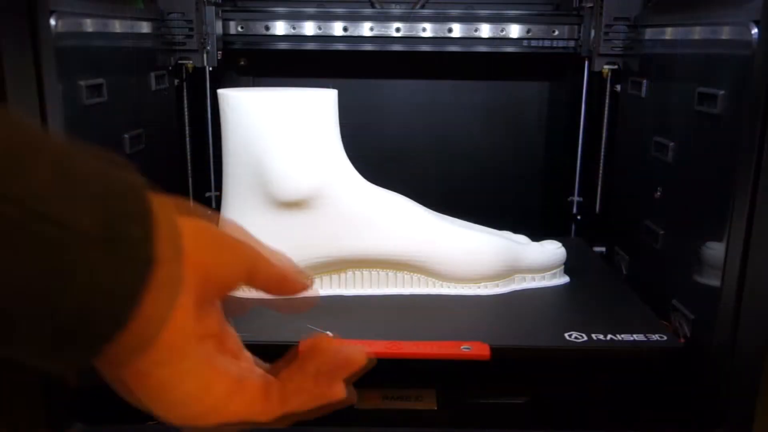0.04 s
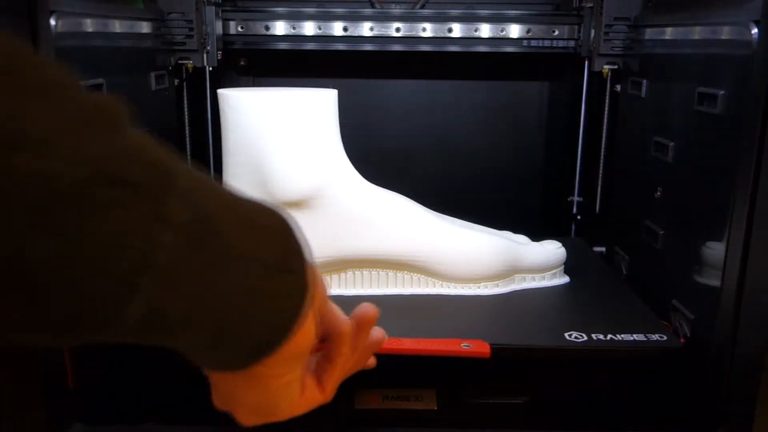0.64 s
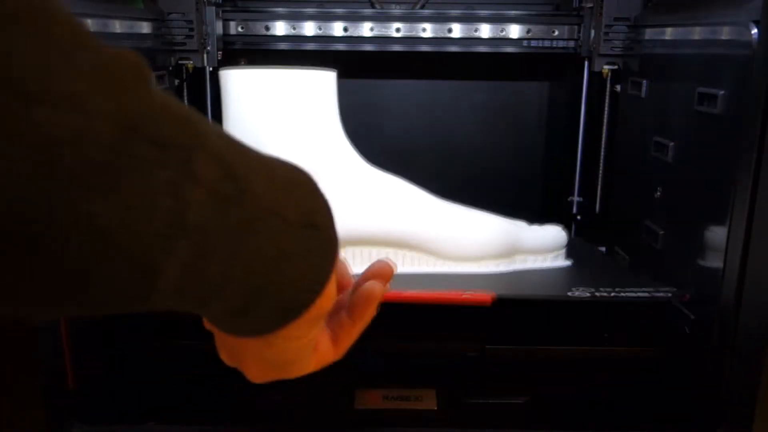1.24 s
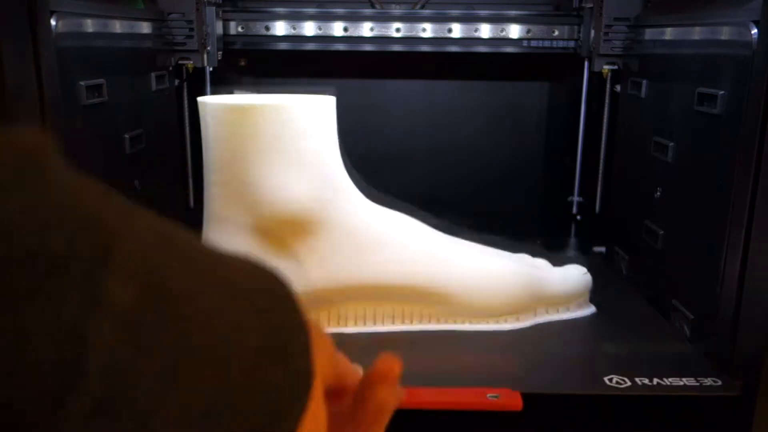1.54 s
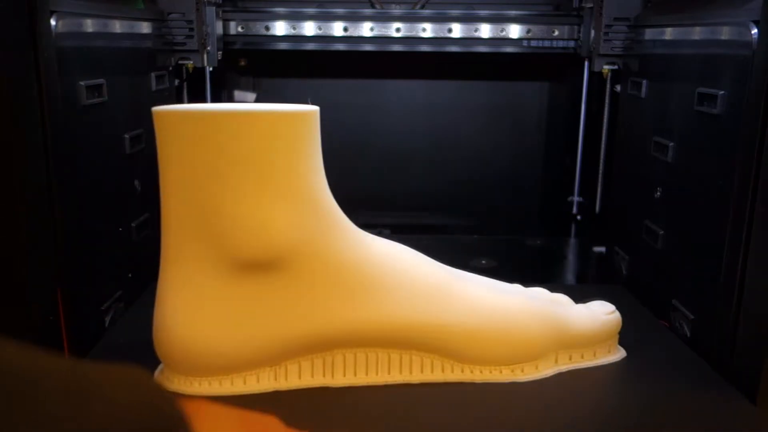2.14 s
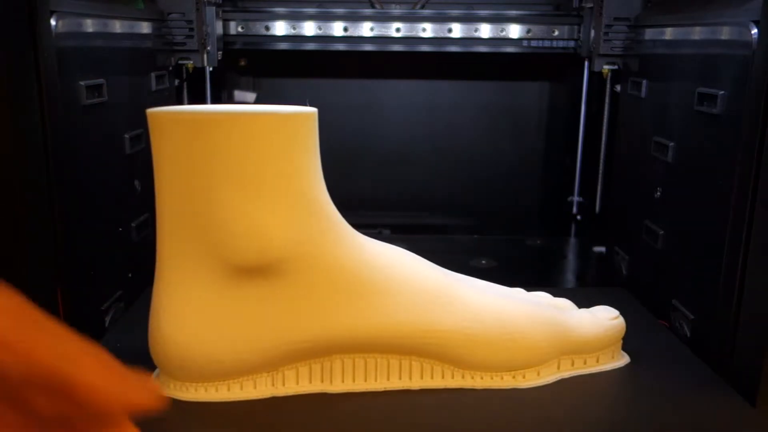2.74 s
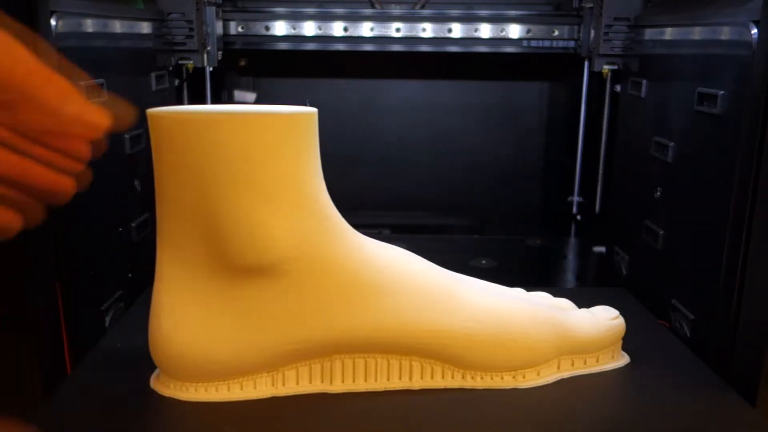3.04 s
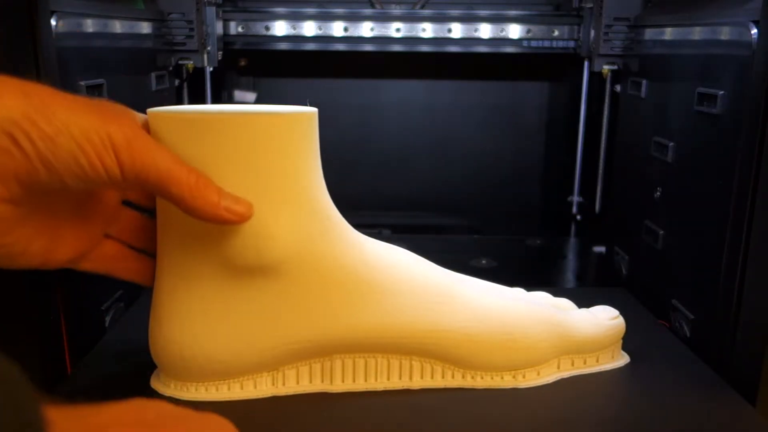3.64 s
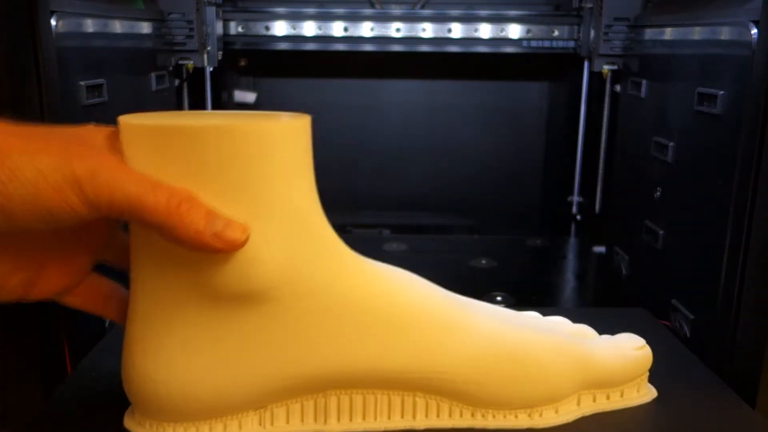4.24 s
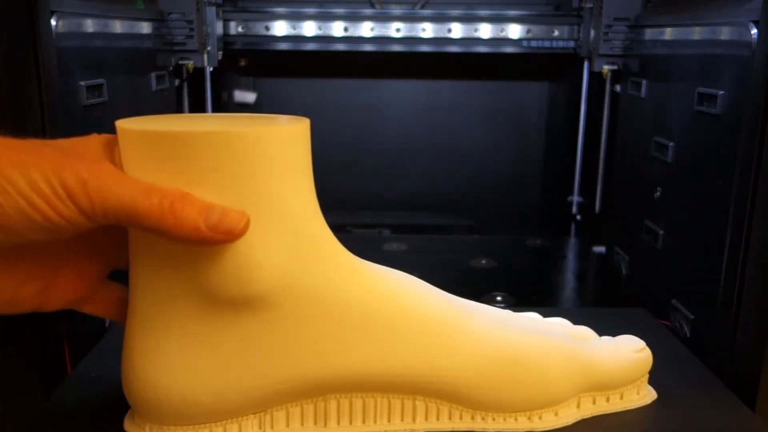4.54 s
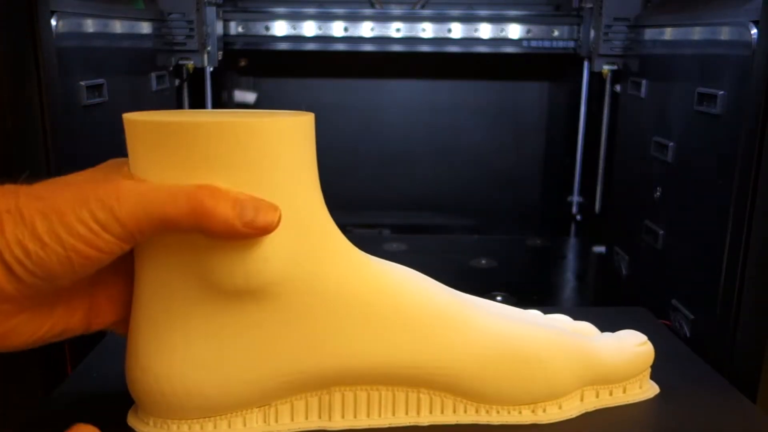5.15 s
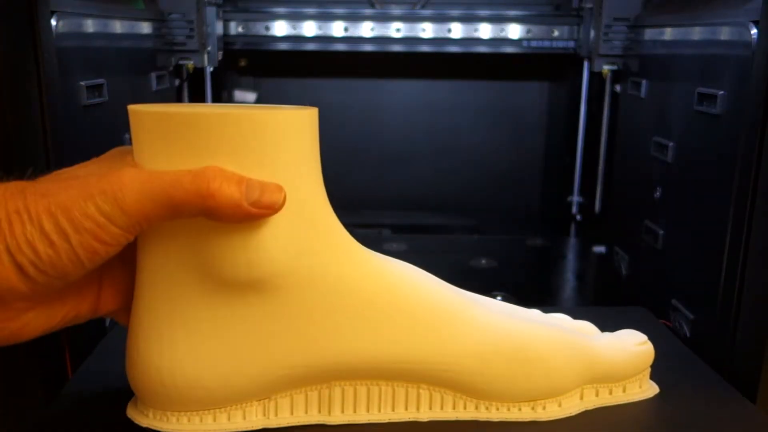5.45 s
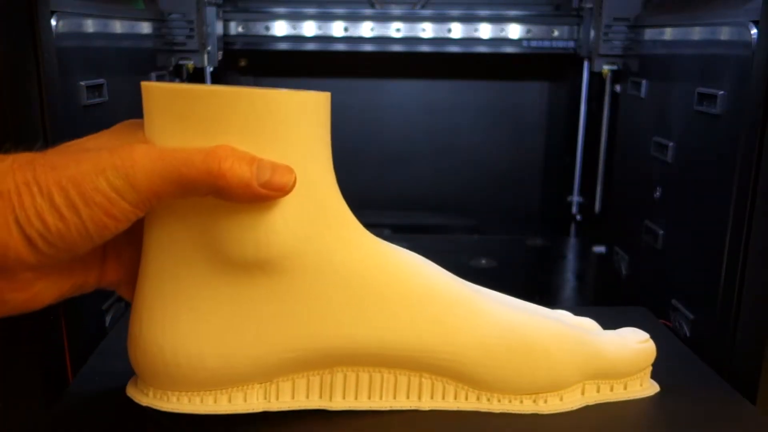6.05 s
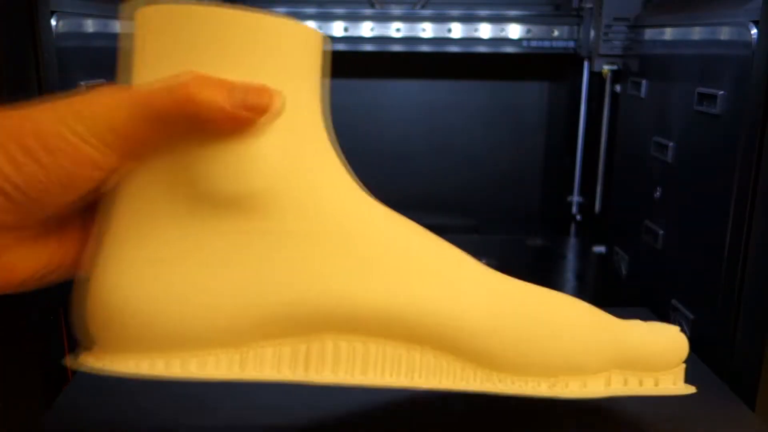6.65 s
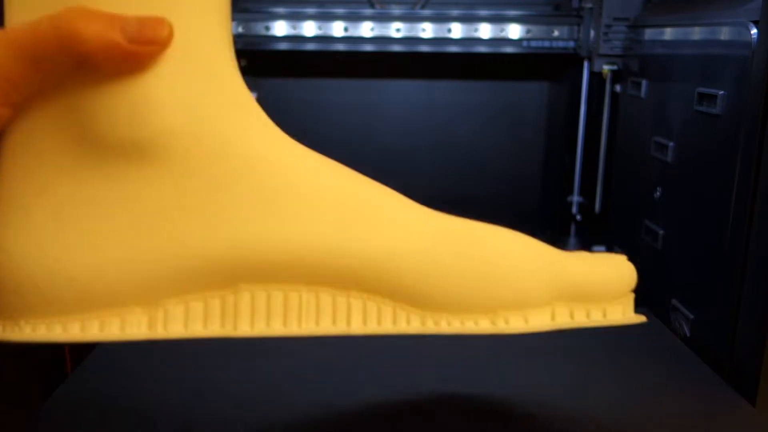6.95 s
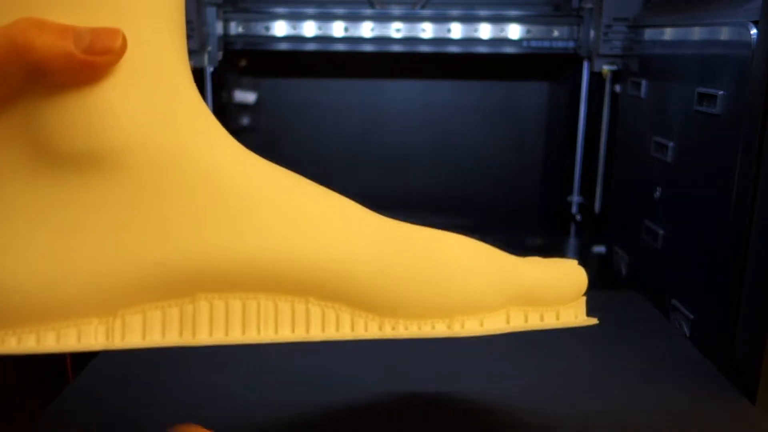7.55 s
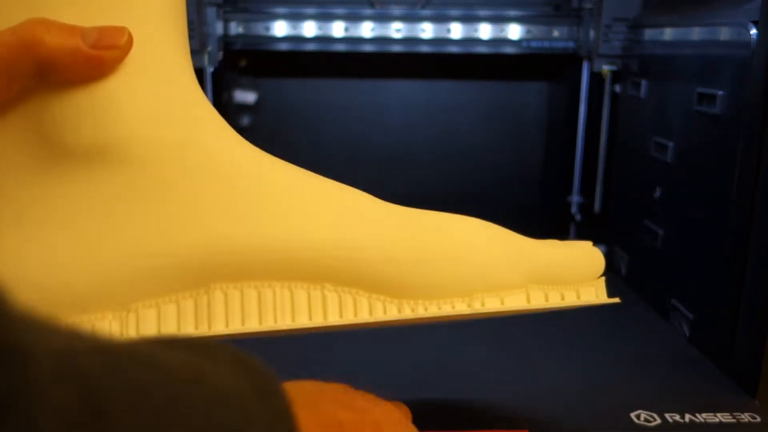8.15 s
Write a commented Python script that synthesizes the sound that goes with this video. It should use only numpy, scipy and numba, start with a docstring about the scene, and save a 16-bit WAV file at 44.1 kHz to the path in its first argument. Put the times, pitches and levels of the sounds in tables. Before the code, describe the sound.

Cooling fans hum faintly in a small room. Close by, a 3D printer's build plate clicks, rasps briefly over its bed and bumps to a stop. A sleeve brushes and rustles softly. Then the plate is bent, and a large hollow plastic print cracks away in sharp spurts before tearing loose all at once. The plate springs back with a ringing clatter, followed by a few lighter knocks, more sleeve brushing and a click.

```python
"""A large hollow print cracks off a flexible build plate in a 3D printer's chamber.
A hand first slides the plate forward, rasping over the bed until it bumps, then bends it.
The bond snaps in spurts that ring the plastic shell, then tears loose all at once.
The plate springs back and is knocked about, ringing in its modes.
A sleeve brushes the machine; cooling fans hum in a small room."""
import sys
import numpy as np
from scipy import signal
from scipy.fft import rfft, irfft, next_fast_len
from scipy.io import wavfile
from numba import njit

SR = 44100
rng = np.random.default_rng(int(sys.argv[2]) if len(sys.argv) > 2 else 0)


def to_wav(sig):
    """Store sig (one row per channel, or 1-D mono) as 16-bit WAV at the path in sys.argv[1].

    Samples outside -1..1 are clipped; the rate is SR.
    """
    pcm = np.clip(np.atleast_2d(sig), -1, 1) * 32767
    pcm = np.round(pcm).astype(np.int16)
    wavfile.write(sys.argv[1], SR, pcm.T)  # frames by channels


N = 370191
TIME = np.arange(N) / SR

# Fan air spectrum. Each row: frequency in Hz, relative level in dB.
FAN_AIR_SPECTRUM = [(30, -20.5), (80, -15), (125, -4.5), (160, -0.5), (255, -9), (325, -2.5), (390, -11.5),
                    (780, -20.5), (1080, -27.5), (1500, -22), (2250, -16), (2700, -24), (5000, -29.5),
                    (11000, -41.5)]
# Blade and motor tones. Each row: frequency in Hz, level in dB.
FAN_TONES = [(156.1, -58.5), (349.9, -57.5), (1610, -68.5), (1809, -61), (2008, -80), (2250, -66),
             (4226, -76), (4549, -74.5)]
# The arm reaches and grips. Each row: start, speed-up and slow-down in seconds, relative level in dB.
RUSTLE_STROKES = [(0, .02, 0.14, -52.5), (1.03, .17, .2, -45), (2.05, .13, 0.15, -37.5),
                  (2.58, 0.44, .55, -50.5), (3.76, 0.17, 0.52, -41.5), (4.55, 0.32, 0.065, -45),
                  (4.94, 0.083, 0.048, -43), (5.125, 0.027, 0.053, -46), (5.27, .05, .08, -42.5)]
# Arm rustle spectrum. Each row: frequency in Hz, relative level in dB.
RUSTLE_SPECTRUM = [(300, -3), (700, 1.5), (1200, -5.5), (3000, -5), (5000, -5.5), (11000, -11)]
# Sleeve on the machine. Each row: start, speed-up and slow-down in seconds, relative level in dB.
BRUSH_STROKES = [(1.775, .19, 0.12, -32.5), (2.135, .055, 0.053, -38), (3.92, 0.26, 0.071, -39),
                 (7.09, 0.074, .19, -33), (7.825, .18, 0.12, -33)]
# Sleeve brush spectrum. Each row: frequency in Hz, relative level in dB.
BRUSH_SPECTRUM = [(290, -10.5), (500, -3), (700, -5.5), (906, -10), (1340, -12), (2240, -4.5), (2690, -4.5),
                  (8720, 1.5), (11000, 0), (14300, -107), (22000, -120)]
# Light taps on the frame. Each row: start in seconds, level in dB, centre in Hz, T60 in seconds.
FRAME_CLICKS = [(1.032, -24.5, 5630, .027), (1.046, -29.5, 3000, 0.041), (1.465, -16, 3800, .07),
                (1.59, -14, 3020, 0.041), (3.984, -37, 3100, .04), (4.095, -36, 3900, .07),
                (7.424, -43, 5400, .07), (7.925, -34.5, 3680, 0.057), (7.974, -15.5, 5000, 0.005)]
# Blows on the plate. Each row: start in seconds, thud level in dB, favoured pitch in Hz,
# clack level in dB, clack centre in Hz, clack T60 in seconds.
PLATE_KNOCKS = [(1.122, -32, 304, -37, 2300, .08), (1.135, -28.5, 119, -22, 3400, 0.026),
                (1.146, -44, 1050, -29, 1100, 0.037), (1.205, -31.5, 148, -44, 322, .24),
                (1.546, -29, 225, -26.5, 450, 0.28), (1.562, -23, 253, -15, 2100, 0.056),
                (1.583, -13.5, 199, -19, 400, 0.12), (1.621, -20, 166, -27.5, 850, 0.25),
                (1.652, -35, 120, -29.5, 1800, 0.16), (1.85, -30, 125, -39, 557, 0.44),
                (4.19, -35, 117, -38.5, 1400, 0.11), (6.243, -34, 490, -22.5, 500, .065),
                (6.273, -17, 483, -16.5, 486, .085), (6.287, -19.5, 160, -12, 1850, .12),
                (6.315, -18, 161, -17.5, 850, .087), (6.335, -16.5, 161, -10, 440, 0.058),
                (6.354, -16.5, 135, -15.5, 355, 0.13), (6.404, -26, 180, -23, 400, 0.13),
                (7.167, -24.5, 265, -24.5, 304, 0.11), (7.187, -24.5, 126, -35, 780, .1),
                (7.216, -30, 210, -37, 750, 0.15), (7.422, -44, 505, -34, 780, 0.072),
                (8.315, -41.5, 157, -46, 400, 0.05)]
# Plate modes. Each row: frequency in Hz, relative level in dB, T60 in seconds.
PLATE_MODES = [(83.3, -17, 0.88), (117.7, -2.5, 0.31), (166, 2, 0.18), (210.3, 2.5, 0.15),
               (269.7, -0.5, 0.15), (328.8, 4, 0.17), (354.6, -2, 0.34), (478, 0.5, 0.24),
               (693, -2.5, 0.58), (812, 1.5, 0.22), (943, -28, .3), (1064, 14.5, 0.12), (1220, -23, .25),
               (1760, -5, .24)]
# Sliding rasp spectrum. Each row: frequency in Hz, relative level in dB.
SLIDE_SPECTRUM = [(600, -30), (720, -2.5), (880, -9), (1020, -7.5), (1300, -8.5), (1800, -8), (2800, -3.5),
                  (5000, -4), (8000, -4.5), (11000, -5)]
# Resonances between plate and bed. Each row: centre in Hz, width in Hz, gain in dB.
GAP_RESONANCES = [(786, 35, -0.5), (1180, 170, -9)]
# Bond cracks. Each row: start in seconds, relative level in dB, relative treble in dB, run in seconds.
BOND_CRACKS = [(5.326, -23.5, 5, 0.018), (5.365, -22, 7.5, 0.027), (5.408, -19, 4, 0.024),
               (5.474, -31.5, 5, 0.015), (5.538, -30.5, 4, 0.0011), (5.57, -28.5, 7.5, 0.016),
               (5.602, -24.5, 9, 0.0096), (5.619, -19.5, 5, 0.0018), (5.657, -28, 8, 0.0027),
               (5.688, -34, 10, 0), (5.7, -34.5, 10, 0.0067), (5.752, -32, 5, 0),
               (5.767, -22.5, 5.5, 0.008), (5.809, -21, -8, 0.0011), (5.841, -33, 1, 0.0086),
               (5.86, -15.5, -4, 0), (5.871, -26, -2, 0.0062), (5.926, -30.5, 4.5, 0.0021),
               (5.991, -29.5, 4, 0.0019), (5.999, -27.5, 5.5, 0), (6.066, -23, 3.5, 0.00057),
               (6.11, -24.5, 4.5, 0), (6.139, -28.5, 7, 0.00038), (6.167, -18, -0.5, 0.00023),
               (6.204, -16, -2.5, 0.00064), (6.227, -15.5, 2.5, 0), (6.243, -16.5, 0, 0.0016)]
# Crack spectrum. Each row: frequency in Hz, relative level in dB.
CRACK_SPECTRUM = [(200, -21), (330, -9), (600, -6.5), (850, -6.5), (1050, -4.5), (1350, -6.5), (2500, 0.5),
                  (3200, -2), (5500, -2.5), (9800, 0), (11000, -2.5)]
# Air pocket under the print. Each row: time in seconds, resonance in Hz.
AIR_POCKET = [(5.65, 683), (5.76, 478)]
# Plate shudders. Each row: start in seconds, length in seconds, level in dB.
PLATE_SHUDDERS = [(7.427, 0.23, -40.5), (7.764, 0.067, -36.5)]
# Room decay. Each row: frequency in Hz, T60 in seconds.
ROOM_DECAY = [(100, 0.57), (500, 0.54), (2000, 0.49), (5000, 0.42), (11000, 0.27)]


def undb(db):
    """Decibels to gain."""
    return 10 ** (np.asarray(db) / 20)


def unit(x):
    """Scale to rms 1."""
    return x / np.sqrt(np.mean(x ** 2))


def along(points, hz):
    """Read (Hz, value) points on a log-frequency axis."""
    points_hz, values = np.transpose(points)
    return np.interp(np.log(hz + 1e-9), np.log(points_hz), values)


def fade(t, t60_s):
    """Exponential decay, 60 dB down at t60_s."""
    return np.exp(-np.log(1000) * t / t60_s)


def since(start_s):
    """Seconds since start_s; zero before."""
    return np.maximum(TIME - start_s, 0)


def envelope(start_s, length_s, attack_s, t60_s):
    """Rise, hold, decay."""
    return (1 - np.exp(-since(start_s) / attack_s)) * fade(since(start_s + length_s), t60_s)


def add(track, start_s, sound):
    """Mix a sound into a track."""
    start = int(start_s * SR)
    track[..., start:start + sound.shape[-1]] += sound[..., :N - start]


def convolve(x, response):
    """Convolve, keeping the input length."""
    return signal.oaconvolve(x, response)[:len(x)]


def colour(x, spectrum, size=8192):
    """Minimum-phase filter of unit power with a (Hz, dB) spectrum."""
    cepstrum = irfft(np.log(undb(along(spectrum, np.fft.rfftfreq(size, 1 / SR)))))
    cepstrum[1:size // 2] *= 2
    cepstrum[size // 2 + 1:] = 0
    response = irfft(np.exp(rfft(cepstrum)))
    return convolve(x, response / np.linalg.norm(response))


@njit
def svf(x, hz, width_hz):
    """State-variable band-pass; centre and width per sample."""
    y, band_state, low_state = np.empty(len(x)), 0., 0.
    for i in range(len(x)):
        g = np.tan(np.pi * min(hz[i], .45 * SR) / SR)
        damping = width_hz[i] / hz[i]
        passed = (band_state + g * (x[i] - low_state)) / (1 + g * (g + damping))
        band_state = 2 * passed - band_state
        low_state += 2 * g * passed
        y[i] = damping * passed
    return y


def band(x, hz, width_hz):
    """Resonance with gain 1 at its centre."""
    return svf(x, hz * np.ones(len(x)), width_hz * np.ones(len(x)))


def walk(rate_hz):
    """Random drift, deviation near 1."""
    points = rng.standard_normal(N // 20)
    return np.interp(TIME * rate_hz, np.arange(len(points)), points)


def grains(per_s, spread_db):
    """Tiny slips of random time and size; rms 1."""
    slips = (rng.random(N) < per_s / SR) * rng.choice([-1, 1], N)
    return unit(slips * undb(spread_db * np.clip(rng.standard_normal(N), -2, 2)))


def spread(pair, apart_hz):
    """Two unrelated signals as one wide source: alike in the bass, unlike in the treble."""
    size = len(pair[0])
    padded = next_fast_len(size)
    mid, side = rfft(np.array(pair), padded)
    coherence = 1 / (1 + (np.fft.rfftfreq(padded, 1 / SR) / apart_hz) ** 1.53)
    mid, side = mid * np.sqrt((1 + coherence) / 2), side * np.sqrt((1 - coherence) / 2)
    return irfft([mid + side, mid - side], padded)[:, :size]


def diffuse(size, apart_hz):
    """Noise from all sides."""
    return spread(rng.standard_normal((2, size)), apart_hz)


def space(x, chamber_db, room_db):
    """Direct sound, quick echoes off the printer's walls, then the room's tail."""
    t = np.arange(SR // 2) / SR
    chamber = diffuse(len(t), apart_hz=2950) * fade(t, t60_s=0.044) * (t > .0012)
    hz, frame_s, cells = signal.stft(diffuse(len(t), apart_hz=1260), SR)
    cells *= fade(frame_s, along(ROOM_DECAY, hz)[:, None])
    room = signal.istft(cells, SR)[1][:, :len(t)] * (t > .006)
    echoes = (undb(chamber_db) * unit(chamber) + undb(room_db) * unit(room)) / np.sqrt(len(t))
    wet = [convolve(side, echo) for side, echo in zip(np.broadcast_to(x, (2, N)), echoes)]
    return (x + np.array(wet)) / np.sqrt(1 + undb(chamber_db) ** 2 + undb(room_db) ** 2)


def fans(air_db=-45.5, slot_db=-61, slot_hz=1277, slot_width_hz=170, drawn_out_s=1.25):
    """Air booms in the chamber under fan tones; a slot rings until the plate is drawn out."""
    air = unit(np.array([colour(side, FAN_AIR_SPECTRUM) for side in diffuse(N, apart_hz=3460)]))
    slot = band(band(rng.standard_normal(N), slot_hz, slot_width_hz), slot_hz, slot_width_hz)
    slot = unit(slot) * fade(since(drawn_out_s), t60_s=1.3)
    rotor_s = np.cumsum(1 + .0004 * walk(3)) / SR
    tones = sum(undb(db + 1.6 * walk(5)) * np.sqrt(2) * np.sin(2 * np.pi * hz * rotor_s)
                for hz, db in FAN_TONES)
    return undb(air_db + .5 * walk(3.5)) * air + undb(slot_db) * slot + tones


def strokes(rows, arch_db=8, lead_s=0.22, t60_s=0.097):
    """Each arm movement creeps in, swells to its fastest moment, slackens and dies away."""
    gain = np.zeros(N)
    for start_s, rise_s, fall_s, db in rows:
        slack = np.interp(TIME - start_s, [0, rise_s, rise_s + fall_s], [-1, 0, 1]) ** 2
        lead_in = fade(np.maximum(start_s - TIME, 0), lead_s)
        tail = fade(since(start_s + rise_s + fall_s), t60_s)
        gain += undb(db - arch_db * slack) * lead_in * tail
    return gain


def sleeve(brush_db=1, rustle_db=-3, left_db=-0.3, right_db=0.3):
    """Fibres catch and slip in a fine uneven hiss."""
    catch = undb(2.4 * walk(70))
    brush = [colour(grains(per_s=7000, spread_db=2.5) * catch, BRUSH_SPECTRUM) for _ in range(2)]
    rustle = [colour(grains(per_s=5000, spread_db=1), RUSTLE_SPECTRUM) for _ in range(2)]
    cloth = undb(brush_db) * unit(spread(brush, apart_hz=7100)) * strokes(BRUSH_STROKES)
    cloth += undb(rustle_db) * unit(spread(rustle, apart_hz=5000)) * strokes(RUSTLE_STROKES)
    return space(cloth, chamber_db=-6, room_db=-9.5) * undb([[left_db], [right_db]])


def clack(t, hz, t60_s):
    """A burst of the frame's many close resonances around one pitch."""
    burst = rng.standard_normal(len(t)) * fade(t, t60_s) * np.sqrt(SR / (2 * hz))
    return band(band(burst, hz, width_hz=hz), hz, width_hz=2 * hz)


def thud(t, favoured_hz, width_octaves=0.44, detune=0.0059):
    """A blow builds over a few milliseconds and rings the plate's modes around one pitch."""
    ring = np.zeros(len(t))
    for hz, db, t60_s in PLATE_MODES:
        gain = undb(db) / (1 + (np.log2(hz / favoured_hz) / width_octaves) ** 2)
        detuned_hz = hz * (1 + detune * rng.standard_normal())
        ring += gain * np.sin(2 * np.pi * detuned_hz * t) * fade(t, t60_s)
    return ring * (1 - fade(t, t60_s=0.016))


def knocking():
    """Blows sound plate and frame, light taps only the frame; the plate also shudders."""
    t = np.arange(SR // 2) / SR
    plate, frame = np.zeros(N), np.zeros(N)
    for start_s, thud_db, favoured_hz, clack_db, clack_hz, clack_t60_s in PLATE_KNOCKS:
        add(plate, start_s, undb(thud_db) * thud(t, favoured_hz))
        add(frame, start_s, undb(clack_db) * clack(t, clack_hz, clack_t60_s))
    for start_s, db, hz, t60_s in FRAME_CLICKS:
        add(frame, start_s, undb(db) * clack(t, hz, t60_s))
    return (space(plate + shudder(), chamber_db=-16, room_db=-10.5)
            + space(frame, chamber_db=2.5, room_db=-7.5))


def sliding(level_db=-14.5):
    """The plate's rough underside rasps over the bed, louder with speed, and rings the gap between."""
    sides = []
    for _ in range(2):
        rasp = grains(per_s=12000, spread_db=4) * undb(walk(120))
        gap = sum(undb(db) * band(rasp, hz, width_hz) for hz, width_hz, db in GAP_RESONANCES)
        sides.append(colour(rasp, SLIDE_SPECTRUM) + gap)
    speed = envelope(start_s=1.2506, length_s=0.28, attack_s=0.14, t60_s=0.22)
    slide = undb(level_db) * speed * unit(spread(sides, apart_hz=6000))
    return space(slide, chamber_db=-6, room_db=-15.5)


def crackle(attack_s=0.0009, run_db=3, run_t60_s=0.045, settle_db=-18, settle_t60_s=0.52):
    """Fine cracks: strong while a crack runs, faint as the bond settles."""
    t = np.arange(SR // 2) / SR
    power = np.zeros(N)
    for start_s, db, _, run_s in BOND_CRACKS:
        growth = 1 - np.exp(-np.minimum(t, run_s) / attack_s)
        running = undb(db + run_db) * growth * fade(np.maximum(t - run_s, 0), run_t60_s)
        settling = undb(db + settle_db) * fade(t, settle_t60_s)
        add(power, start_s, running ** 2 + settling ** 2)
    return spread([grains(per_s=1100, spread_db=5.5) for _ in range(2)], apart_hz=6030) * np.sqrt(power)


def air_pocket(x, gain_db, width_hz):
    """The air under the lifting print resonates, lower as the pocket grows."""
    return undb(gain_db) * band(x, np.interp(TIME, *np.transpose(AIR_POCKET)), width_hz)


def cracking(snap_db=20, treble_trim_db=-1, split_hz=5000, shell_db=-16, rib_db=1, edge_db=-12.5):
    """Each bit of bond snaps and briefly rings the plastic shell; finer cracks fill the gaps."""
    t = np.arange(SR // 20) / SR
    track = crackle()
    for start_s, db, treble_db, _ in BOND_CRACKS:
        snap = (t == 0) + undb(shell_db) * diffuse(len(t), apart_hz=5030) * fade(t, t60_s=0.021)
        rib_hz = 3300 * 2 ** rng.uniform(-0.58, 0.59)  # each crack frees another support rib
        snap = np.array([side + undb(rib_db) * band(side, rib_hz, width_hz=350) for side in snap])
        dull = signal.lfilter(*signal.butter(1, split_hz, fs=SR), snap)
        crack = undb(db + snap_db) * (dull + undb(treble_db + treble_trim_db) * (snap - dull))
        add(track, start_s, crack)
        add(track, start_s - rng.uniform(0.00061, 0.0056), undb(edge_db) * crack)  # edge gives first
    left, right = (colour(side + air_pocket(side, gain_db=4, width_hz=60), CRACK_SPECTRUM)
                   for side in track)
    # the print's heel is left of centre: one sample later on the right
    return space(np.array([left, np.roll(right, 1)]), chamber_db=-4, room_db=-8)


def tearing(start_s=6.214, level_db=-14, sag_db_per_s=46, from_hz=9300, to_hz=1100, glide_s=0.034):
    """Cracks run together in jerks, weaker and deeper as the print peels off; the air pocket booms."""
    hz = to_hz + (from_hz - to_hz) * np.exp(-since(start_s) / glide_s)
    width_hz = 1.8 * hz
    force = undb(level_db - sag_db_per_s * since(start_s))
    force *= envelope(start_s, length_s=.16, attack_s=0.016, t60_s=0.16)
    jerks = undb(3.5 * walk(220))
    rips = []
    for _ in range(2):
        snaps = unit(grains(per_s=5000, spread_db=2.5) * jerks)
        rips.append(band(snaps, hz, width_hz) + air_pocket(snaps, gain_db=-4, width_hz=65))
    equal_power = np.sqrt(1 + SR / (np.pi * width_hz))
    return space(spread(rips, apart_hz=8000) * equal_power * force, chamber_db=-3, room_db=-5.5)


def shudder():
    """The bent plate shakes in the hand with a low rumble."""
    shaking = sum(undb(db) * envelope(start_s, length_s, attack_s=0.0088, t60_s=.35)
                  for start_s, length_s, db in PLATE_SHUDDERS)
    rumble = band(rng.standard_normal(N), hz=158, width_hz=36)
    return unit(band(rumble, hz=120, width_hz=106)) * shaking


def scene():
    """Everything at the printer's open door."""
    return sliding() + knocking() + cracking() + tearing() + sleeve() + fans()


def record(dry, low_hz=45.4, top_hz=11000):
    """Thin the deep bass; cut the top steeply."""
    thin = signal.sosfilt(signal.butter(2, low_hz, "high", fs=SR, output="sos"), dry)
    return signal.sosfilt(signal.ellip(10, .2, 70, top_hz, fs=SR, output="sos"), thin)


dry = scene()
out = record(dry)
to_wav(out)
```